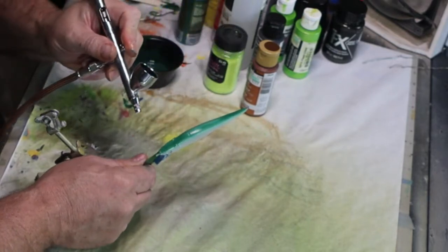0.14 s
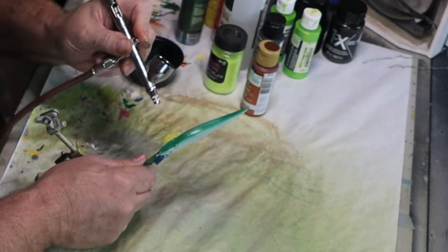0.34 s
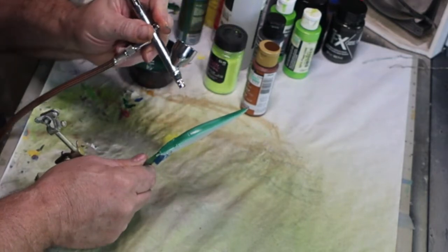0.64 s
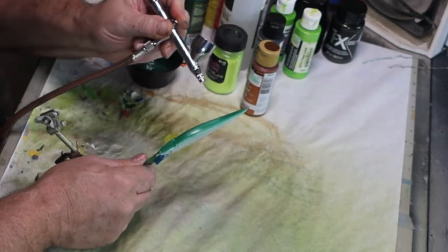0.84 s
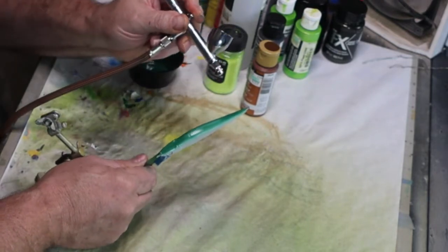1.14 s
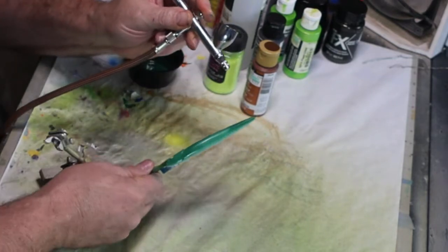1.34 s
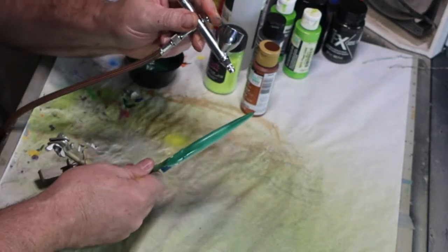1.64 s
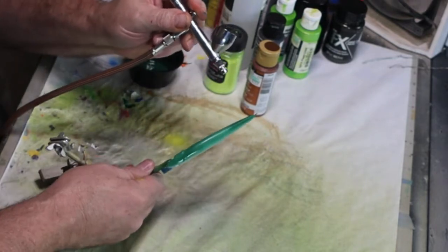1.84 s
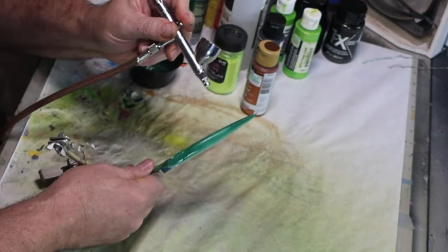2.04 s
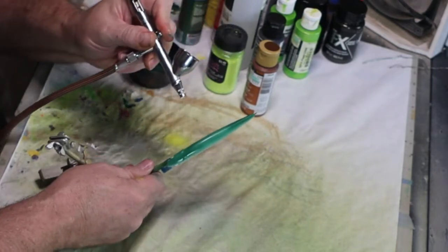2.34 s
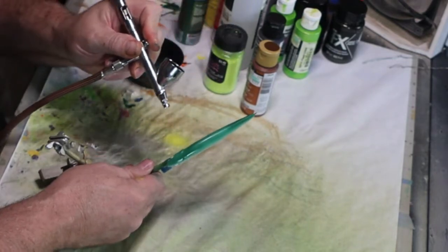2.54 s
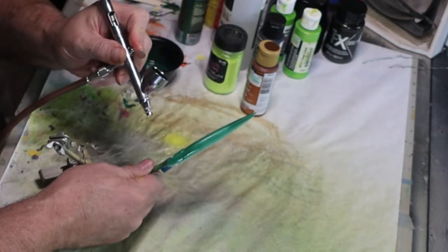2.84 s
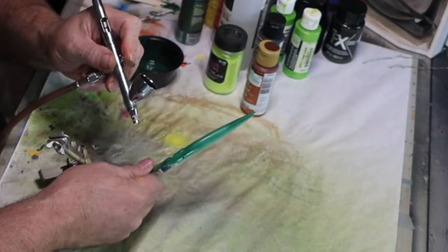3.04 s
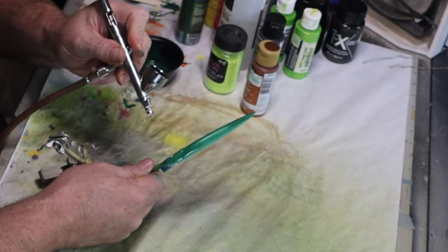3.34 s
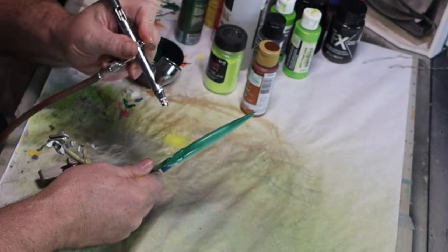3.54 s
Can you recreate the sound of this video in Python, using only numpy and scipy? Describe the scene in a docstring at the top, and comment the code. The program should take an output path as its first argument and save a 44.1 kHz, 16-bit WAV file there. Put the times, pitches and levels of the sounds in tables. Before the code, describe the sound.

An airbrush hisses, pauses briefly and sprays again over a small throbbing compressor.

```python
"""An airbrush hisses over a soft plastic lure on a paper-covered bench, shuts off for a moment
and opens again in two steps. Its spray rushes and rasps where it strikes. Just after the hiss
begins there is a sharp electrical snap, and a small piston compressor starts up. It throbs with
a faint whine and fades near the end. One close microphone turns itself down after loud peaks."""
import sys
import numpy as np
from scipy import signal
from scipy.fft import rfft, irfft, next_fast_len
from scipy.io import wavfile
from scipy.ndimage import map_coordinates

SR = 44100
rng = np.random.default_rng(int(sys.argv[2]) if len(sys.argv) > 2 else 0)


def transcribe(signal):
    """Save signal, clipped to [-1, 1], as a 16-bit WAV file at the path in sys.argv[1]."""
    frames = np.atleast_2d(signal).T
    limited = np.clip(frames, -1, 1)
    pcm = np.round(limited * 32767).astype(np.int16)
    wavfile.write(sys.argv[1], SR, pcm)


N = 163170
T = np.arange(N) / SR


def from_db(db):
    """Turn decibels into a number to multiply by."""
    return 10 ** (np.asarray(db) / 20)


def rms_one(x):
    """Scale a signal so its average strength (rms) is 1."""
    return x / np.sqrt(np.mean(x ** 2) + 1e-20)


def level(rows):
    """Join (seconds, dB) points into a volume curve."""
    return from_db(np.interp(T, *np.transpose(rows)))


def drift(rate_hz):
    """A smooth random wander, about 1 in size."""
    r = np.exp(-2 * np.pi * rate_hz / SR)
    return rms_one(signal.lfilter([1], [1, -2 * r, r * r], rng.standard_normal(N + SR))[SR:])


def noise(colour):
    """Noise of strength 1; its colour says how strong each frequency is."""
    hz, db = np.transpose(colour)
    size = next_fast_len(N)
    bins = np.maximum(np.fft.rfftfreq(size, 1 / SR), 1)
    gain = from_db(np.interp(np.log(bins), np.log(hz), db))
    return rms_one(irfft(rfft(rng.standard_normal(size)) * gain, size)[:N])


def band(x, low_hz, high_hz):
    """Keep the sound between two frequencies."""
    return signal.sosfilt(signal.butter(2, [low_hz, high_hz], "band", fs=SR, output="sos"), x + 1e-18)


def tone(cycles):
    """A pure tone of strength 1, starting anywhere in its wave."""
    return np.sqrt(2) * np.sin(2 * np.pi * (cycles + rng.random()))


MAINS_HZ = 60
# Workshop noise. Each row: frequency in Hz, relative level in dB.
ROOM_COLOUR = [(25, -68), (60, -20), (180, 6.5), (400, -6), (650, 2.5), (900, -1), (1300, -17),
               (2000, -16.5), (3600, -16.5), (5000, -21), (9000, -31), (15500, -28)]
def room():
    """Steady background noise and a faint hum of mains electricity."""
    return from_db(-53) * noise(ROOM_COLOUR) + from_db(-67.5) * tone(MAINS_HZ * T)


# Electrical spikes. Each row: time in seconds, relative height.
SNAP_SPIKES = [(.12492, .35), (.125, 1.0), (.12549, 1.0)]
def snap(width_s=.000017):
    """One-sided spikes within a millisecond make one snap that does not ring."""
    spikes = sum(height * np.exp(-.5 * ((T - s) / width_s) ** 2) for s, height in SNAP_SPIKES)
    bass_cut = signal.butter(1, 69, "high", fs=SR, output="sos")
    return -from_db(-1.5) * signal.sosfilt(bass_cut, spikes + 1e-18)


# Start-up buzz. Each row: multiple of the mains frequency, level in dB.
BUZZ_TONES = [(2, -52), (16, -41)]
def starting_buzz(peak_s=.301, width_s=.022):
    """The motor buzzes briefly as it takes up current."""
    swell = np.exp(-.5 * ((T - peak_s) / width_s) ** 2)
    return swell * sum(from_db(db) * tone(round(k) * MAINS_HZ * T) for k, db in BUZZ_TONES)


TURNS_PER_S = 28.83
# The motor's timing. Each row: time in seconds, how late it runs in seconds (minus is early).
MOTOR_LAG = [(.35, -.0019), (.55, -.0012), (.8, -.00075), (1.15, -.00025), (1.5, 0), (2.15, .00005),
             (2.5, -.0005), (2.95, -.00075), (3.2, -.00055), (3.6, .0006)]
def motor_lag(times):
    """The motor falls behind and catches up as its load changes."""
    return np.interp(times, *np.transpose(MOTOR_LAG))


# Low motor hum. Each row: multiple of the turning rate, level in dB, its partner's level in dB.
HUM_TONES = [(2, -64, -70), (3, -58.5, -69), (4, -61, -64.5), (5, -57.5, -66.5), (6, -59.5, -58)]
def hum(turns, poles=4, throb_start_s=.009, stagger_s=.02):
    """Each low tone throbs against a slightly higher partner made by the motor's magnetism."""
    throb_hz = 2 * MAINS_HZ - poles * TURNS_PER_S
    out = 0
    for k, db, partner_db in HUM_TONES:
        cycles = round(k) * turns + rng.random()
        throbs = throb_hz * (T - throb_start_s - round(k) * stagger_s)
        out += from_db(db) * np.sin(2 * np.pi * cycles)
        out += from_db(partner_db) * np.sin(2 * np.pi * (cycles + throbs))
    return np.sqrt(2) * out


# Valve and piston knocks in one turn. Each row: seconds after the main knock, relative level in dB.
TURN_KNOCKS = [(0, 0), (.00634, -6.7), (.01159, -6.5), (.01808, -4), (.02106, -2.3), (.02757, -5.2)]
def knocks(first_s=.30412, jitter_s=.00001, spread_db=.8):
    """The same clicks come on every turn, a little uneven in time and strength."""
    turn_times = first_s + np.arange(-2, N / SR * TURNS_PER_S) / TURNS_PER_S
    turn_times += motor_lag(turn_times)
    clicks = np.zeros(N)
    for delay, db in TURN_KNOCKS:
        chance = rng.standard_normal((len(turn_times), 2))
        at = np.round((turn_times + delay + jitter_s * chance[:, 0]) * SR).astype(int)
        clicks[at[at < N]] += from_db(.6 + db + spread_db * chance[at < N, 1])
    return clicks


# Notes the housing rings at. Each row: frequency in Hz, width in Hz, boost in dB.
HOUSING_NOTES = [(901.6, 78.7, 13.2), (970, 72, 10.4), (1060, 66, -5)]
def piston(cushion_hz=1210):
    """Cushioned knocks ring the compressor's housing and body."""
    clicks = knocks()
    housing = sum(from_db(db) * band(clicks, hz - width / 2, hz + width / 2)
                  for hz, width, db in HOUSING_NOTES)
    body = from_db(-21) * band(clicks, low_hz=190, high_hz=760)
    return signal.sosfilt(signal.butter(6, cushion_hz, fs=SR, output="sos"), housing + body)


# Motor drone. Each row: multiple of the turning rate, level in dB.
DRONE_TONES = [(9, -67), (12, -63.5), (13, -59.5), (14, -62.5), (18, -68), (19, -57), (23, -67), (38, -65),
               (60, -72.5)]
# Motor whine. Each row: time in seconds, level in dB.
WHINE_LEVEL = [(.3, -52.5), (1.5, -51), (2.3, -48.5), (3.0, -49.5), (3.6, -48)]
def compressor(on_s=.265, rise_s=.035, off_s=3.605, fade_s=.13):
    """Knocks, hum, drone and whine all keep step with the turning motor."""
    fade_in = np.clip((T - on_s) / rise_s, 0, 1)
    fade_out = np.clip(1 - (T - off_s) / fade_s, 0, 1) ** 2
    turns = TURNS_PER_S * (T - motor_lag(T))
    drone = sum(from_db(db) * tone(round(k) * turns) for k, db in DRONE_TONES)
    whine = level(WHINE_LEVEL) * tone(20 * turns)
    return fade_in * fade_out * (piston() + hum(turns) + drone + whine)


# Echoes off the bench and bottles. Each row: delay in seconds, relative level in dB.
BENCH_ECHOES = [(.00085, -15), (.0012, -42), (.0019, -25.5), (.0025, -19), (.0046, -10.5)]
def add_bench_echoes(x, sway_share=.0486, sway_hz=.46):
    """Very short echoes colour the hiss and shift as the hand moves."""
    out = x.copy()
    for delay, db in BENCH_ECHOES:
        lag = delay * SR * (1 + sway_share * drift(sway_hz))
        out += from_db(db) * map_coordinates(x, [np.arange(N) - lag], order=3)
    return out


# Faint whistle as the nozzle closes and reopens. Each row: time in seconds, level in dB.
WHISTLE_LEVEL = [(1.74, -85), (1.82, -55.5), (1.87, -60), (1.9, -97), (2.39, -99), (2.43, -58), (2.52, -68),
                 (2.58, -63), (2.7, -71), (2.8, -90)]
def whistle(pitch_hz=3320, width_hz=75):
    """Air rings the nozzle at one note, and more weakly an octave higher."""
    low, high = pitch_hz - width_hz / 2, pitch_hz + width_hz / 2
    note, octave = (rms_one(band(rng.standard_normal(N), k * low, k * high)) for k in (1, 2))
    return level(WHISTLE_LEVEL) * (note + from_db(-5) * octave)


# How loud the rush and its hollow low end are. Each row: time in seconds, level in dB.
RUSH_LEVEL = [(0, -43), (.07, -41.5), (.25, -46.5), (.5, -46.5), (.77, -53), (.89, -39.5), (1.13, -41.5),
              (1.25, -41.5), (1.4, -44.5), (1.52, -40.5), (1.66, -43), (1.8, -50.5), (1.9, -49.5),
              (2.3, -54.5), (2.49, -65), (2.62, -44.5), (2.96, -48), (3.39, -43), (3.7, -60)]
HOLLOW_LEVEL = [(0, -57), (.06, -47), (.15, -53.5), (.85, -68), (1.2, -50.5), (1.52, -51), (1.7, -70),
                (2.5, -66), (2.85, -55), (3.12, -55), (3.4, -57)]
# Their colours. Each row: frequency in Hz, relative level in dB.
RUSH_COLOUR = [(100, -63), (280, -24.5), (400, -11.5), (600, -10), (740, 0), (850, -0.5), (980, -5),
               (1110, -6.5), (1230, -16.5), (1600, -23), (3000, -38)]
HOLLOW_COLOUR = [(100, -36), (220, -17), (330, -6.5), (480, -4), (700, -21), (1500, -58)]
def spray_rush():
    """Swirling spray makes a low rush as it lands on the lure and paper."""
    return level(RUSH_LEVEL) * noise(RUSH_COLOUR) + level(HOLLOW_LEVEL) * noise(HOLLOW_COLOUR)


# How loud the jet's hiss, rasp and spit are. Each row: time in seconds, level in dB.
HISS_LEVEL = [(0, -47.5), (.35, -46.5), (.62, -47), (.74, -49.5), (.87, -46.5), (1.35, -48), (1.855, -47),
              (1.895, -65.5), (2.268, -75), (2.288, -52), (2.405, -56.5), (2.425, -49), (3.1, -49),
              (3.68, -48), (3.7, -55)]
RASP_LEVEL = [(0, -50.5), (.4, -51.5), (.62, -51), (.74, -57), (.865, -43.5), (1.0, -52.5), (1.35, -50.5),
              (1.5, -46.5), (1.67, -43.5), (1.78, -53.5), (1.85, -57), (1.9, -71), (2.4, -62), (2.47, -57),
              (2.58, -51), (2.85, -57.5), (3.25, -57.5), (3.45, -51.5), (3.7, -54.5)]
SPIT_LEVEL = [(.2, -69), (.6, -52.5), (.73, -62), (.85, -51), (1.05, -66), (1.8, -90), (2.4, -90),
              (2.5, -62.5), (3.56, -58), (3.595, -46.5), (3.62, -53), (3.68, -49.5), (3.7, -75)]
# Their colours. Each row: frequency in Hz, relative level in dB.
HISS_COLOUR = [(40, -11), (300, -8), (1500, -4), (2400, -.5), (3200, -.5), (4100, -2.5), (5500, 0),
               (7000, 0), (7700, -4.5), (8700, -1.7), (10500, -4), (12300, -2.5), (13600, -4.8),
               (14500, -4.3), (15700, -9)]
RASP_COLOUR = [(100, -11), (400, -8.5), (900, 1.5), (1600, -4), (2150, 2), (2500, 3), (3100, 2),
               (4000, -22), (5800, -16), (9000, -57)]
SPIT_COLOUR = [(1500, -27), (3000, 3), (4800, 4.5), (5500, 12), (6500, 10.5), (7500, -10), (12000, -31)]
def airbrush(jet_flutter_db=.4, rush_flutter_db=1, flutter_hz=25):
    """The trigger lets a hissing jet of air and paint out of the nozzle; its level flutters a little."""
    hiss = level(HISS_LEVEL) * noise(HISS_COLOUR)
    rasp = level(RASP_LEVEL) * noise(RASP_COLOUR)  # the jet grazes an edge
    spit = level(SPIT_LEVEL) * noise(SPIT_COLOUR)  # the paint flow surges
    rush = spray_rush()
    jet_flutter = from_db(jet_flutter_db * drift(flutter_hz))
    rush_flutter = from_db(rush_flutter_db * drift(flutter_hz))
    return (hiss + rasp + spit) * jet_flutter + rush * rush_flutter + whistle()


def scene():
    """Add all the sounds together, the same on the left and right."""
    mono = room() + add_bench_echoes(airbrush()) + compressor() + starting_buzz() + snap()
    return np.array([mono, mono])


def record(dry, threshold_db=-21, max_cut_db=9, recover_db_per_s=174, attack_s=.0061, top_hz=15680):
    """The microphone turns down after a peak, comes back up, and loses the highest treble."""
    level_db = 20 * np.log10(np.abs(dry).max(axis=0) + 1e-9)
    cut_db = np.clip(level_db - threshold_db, 0, max_cut_db)
    recovery_db = recover_db_per_s * T
    held_db = np.maximum.accumulate(cut_db + recovery_db) - recovery_db
    r = np.exp(-1 / (attack_s * SR))
    smooth_cut_db = signal.lfilter([1 - r], [1, -r], held_db)
    treble_cut = signal.firwin(301, top_hz, fs=SR)
    return signal.fftconvolve(dry * from_db(-smooth_cut_db), treble_cut[None], "same", axes=1)


dry = scene()
out = record(dry)
transcribe(out)
```